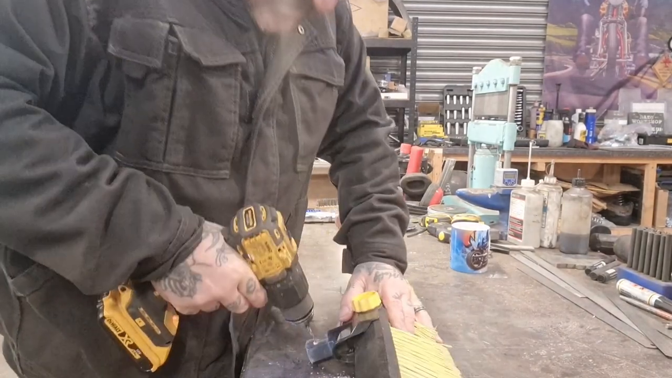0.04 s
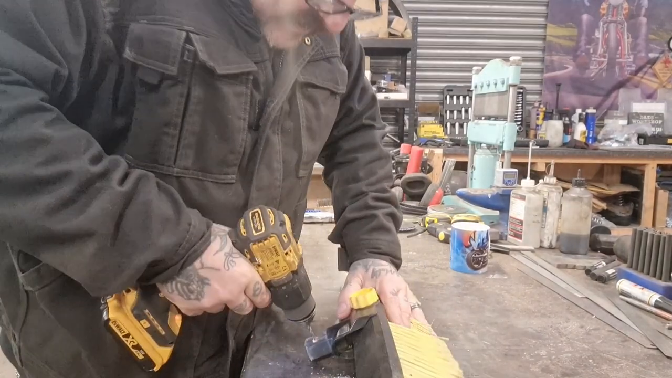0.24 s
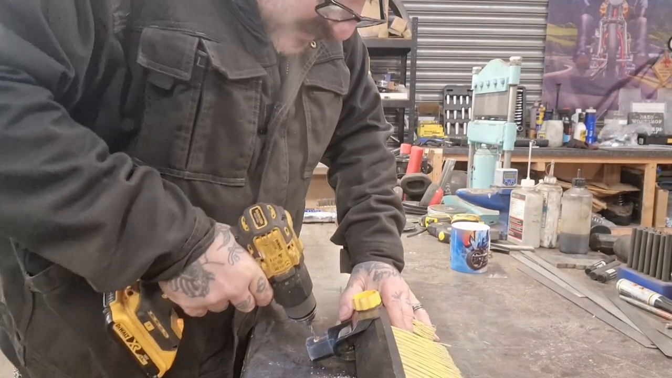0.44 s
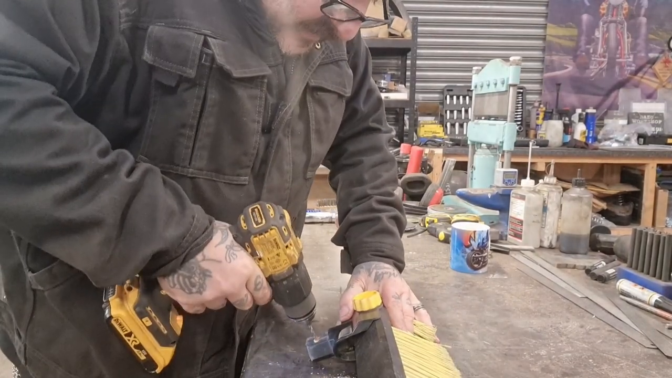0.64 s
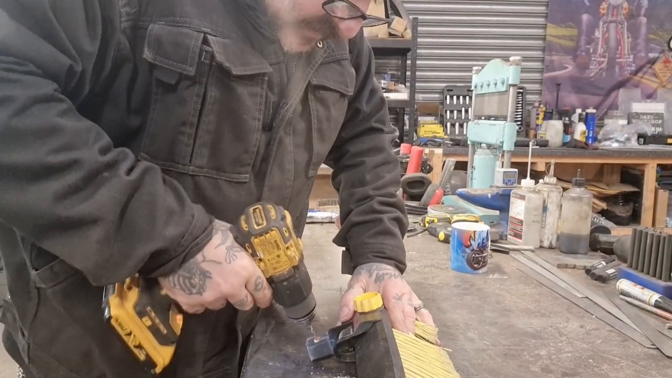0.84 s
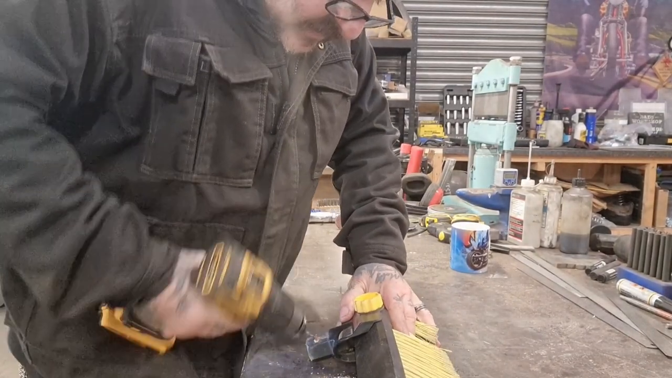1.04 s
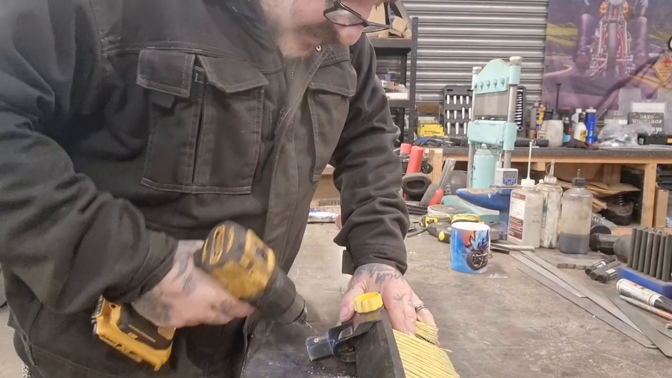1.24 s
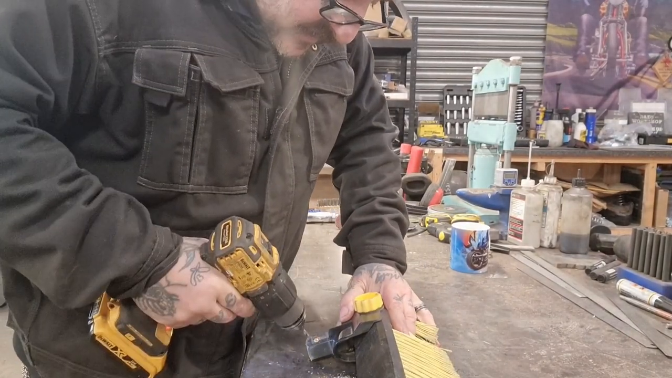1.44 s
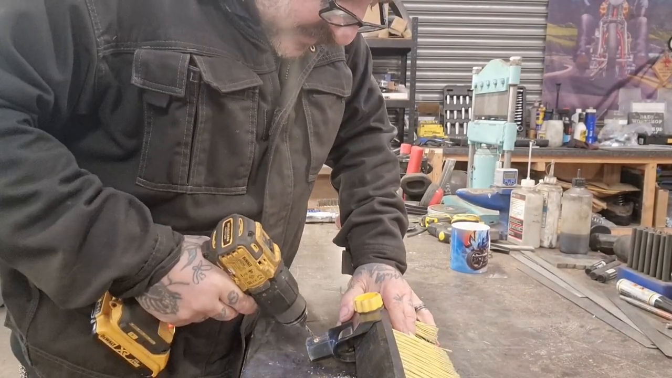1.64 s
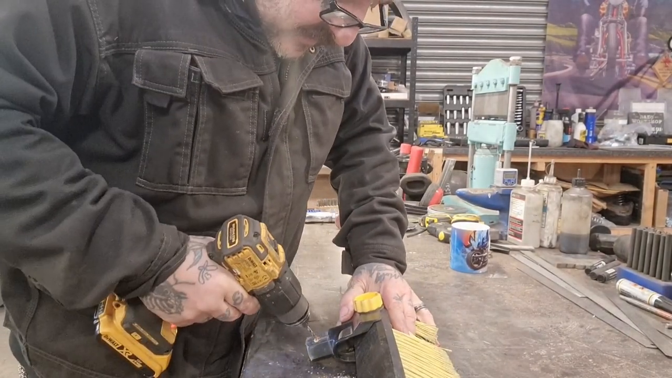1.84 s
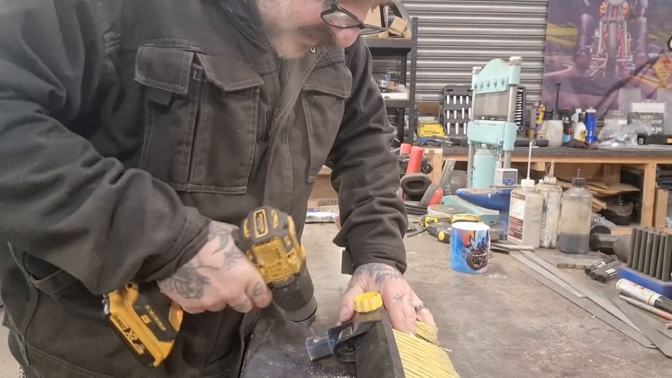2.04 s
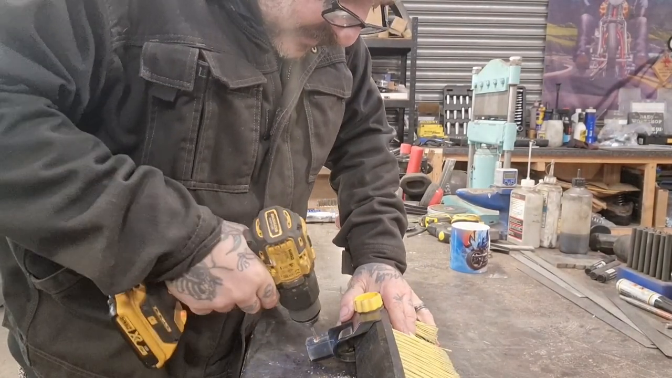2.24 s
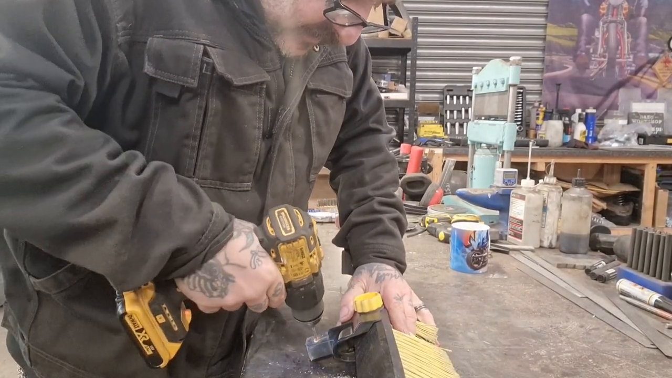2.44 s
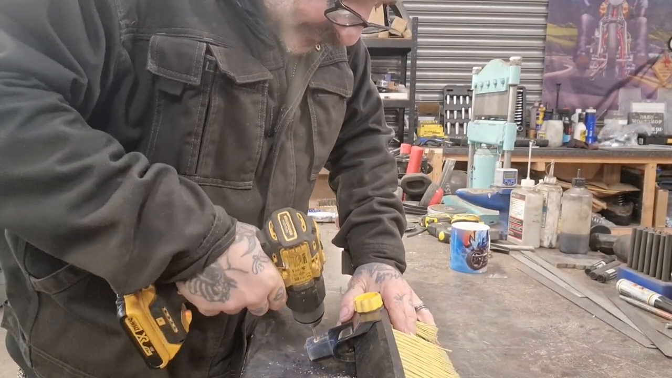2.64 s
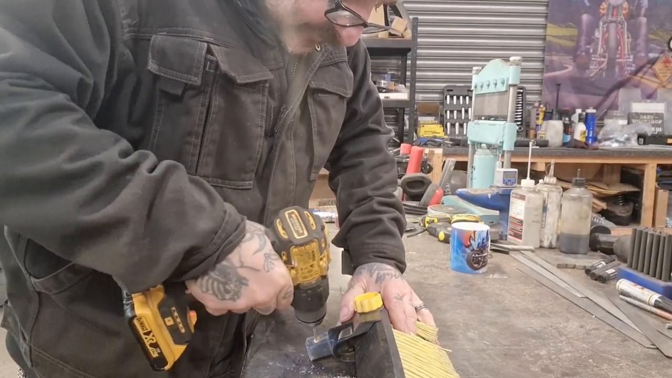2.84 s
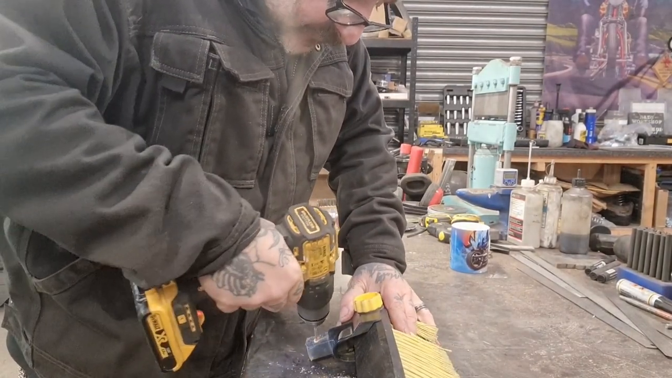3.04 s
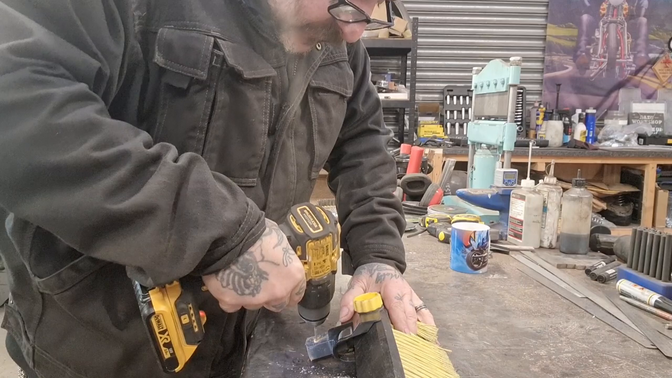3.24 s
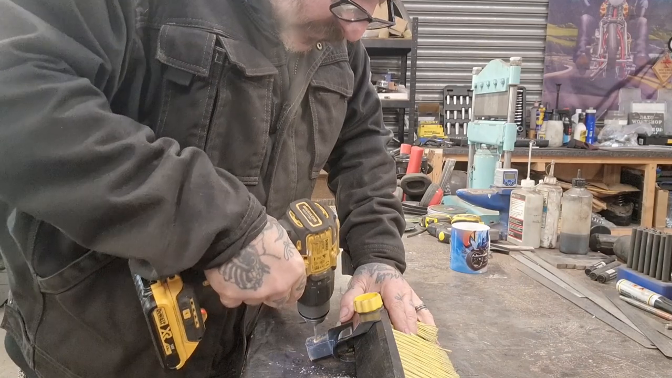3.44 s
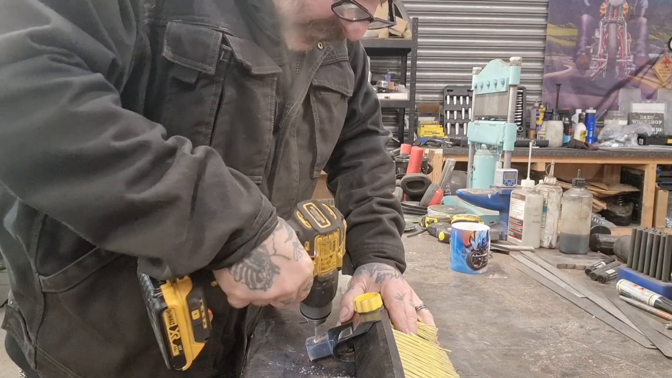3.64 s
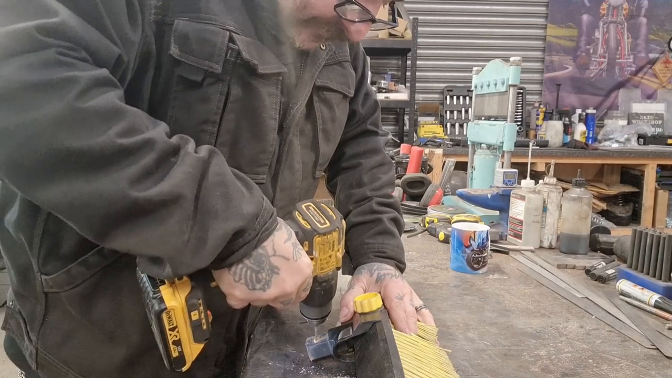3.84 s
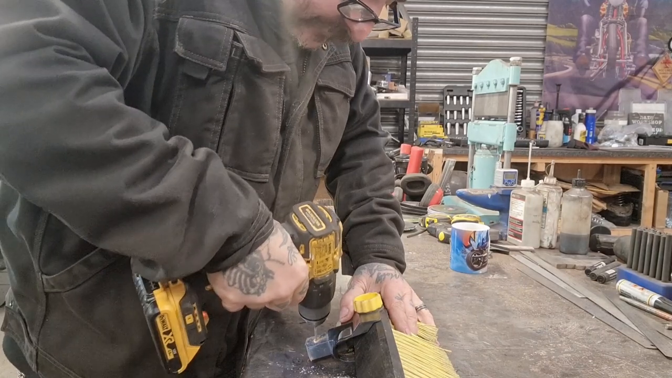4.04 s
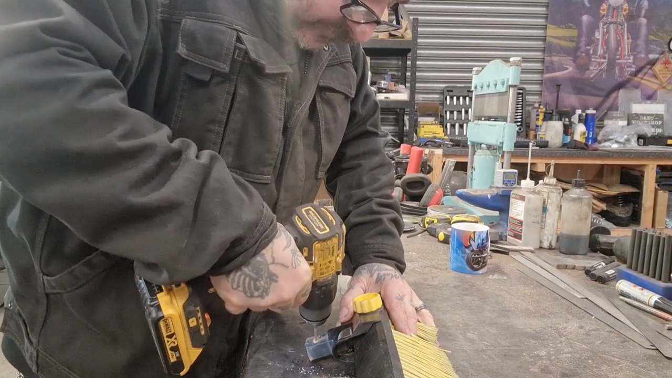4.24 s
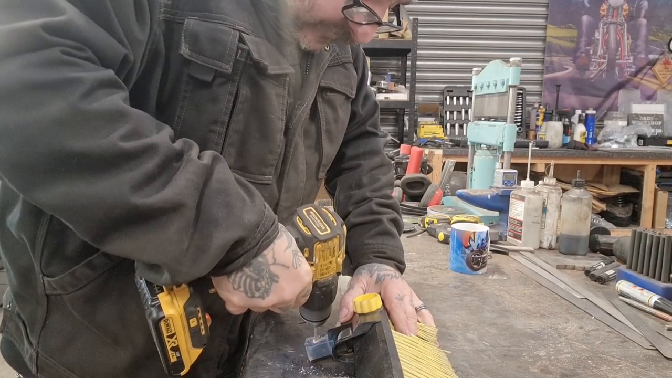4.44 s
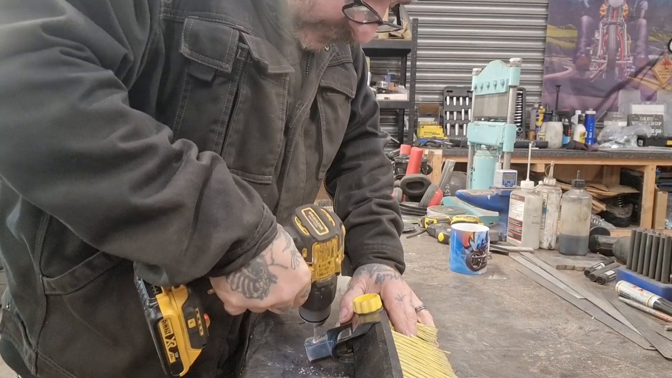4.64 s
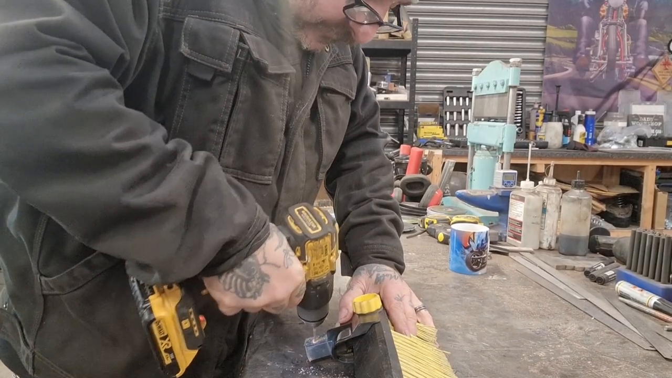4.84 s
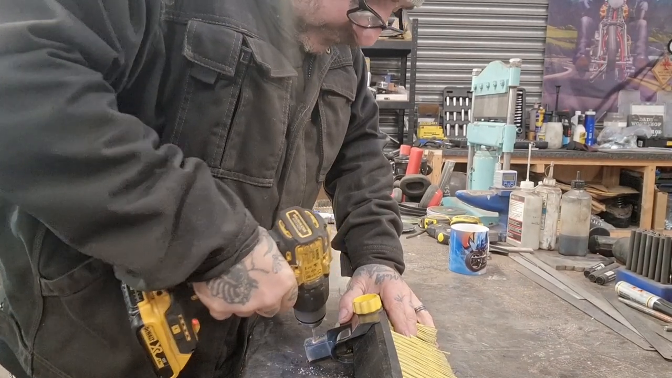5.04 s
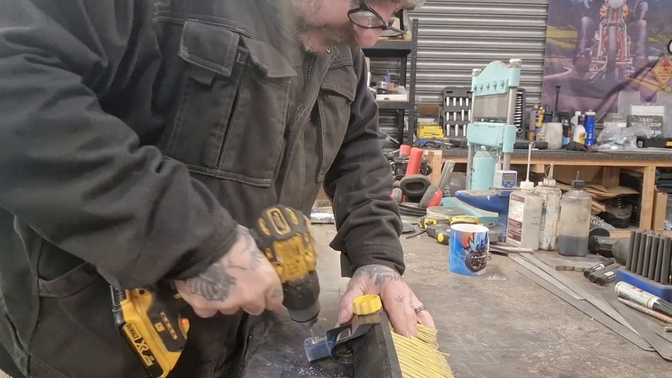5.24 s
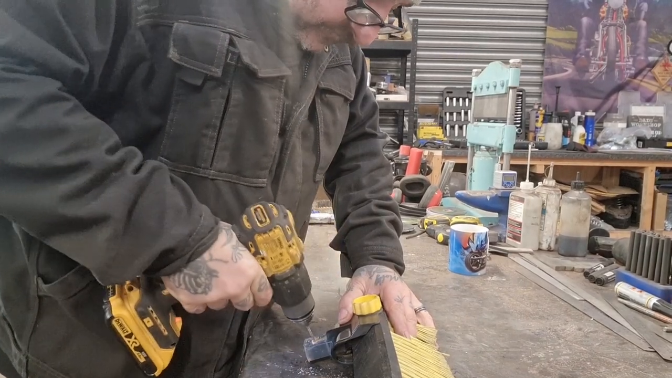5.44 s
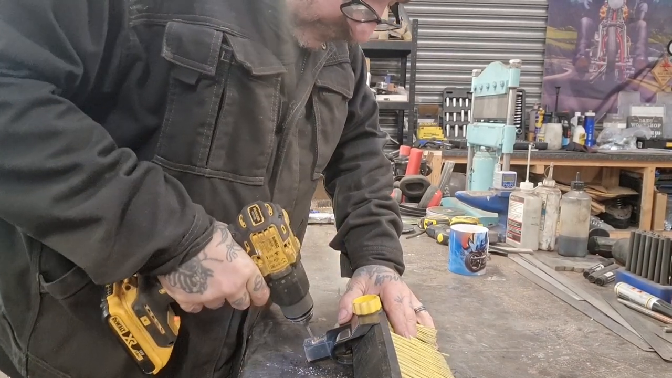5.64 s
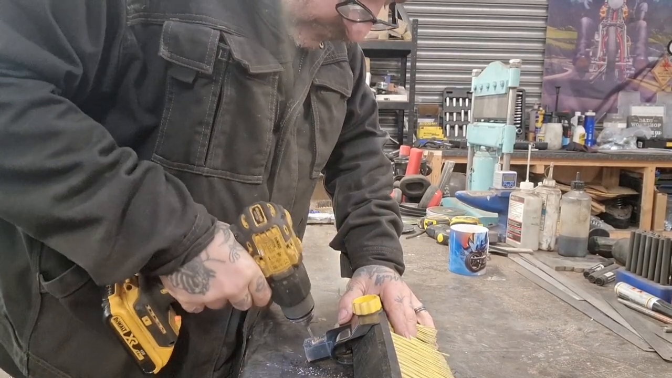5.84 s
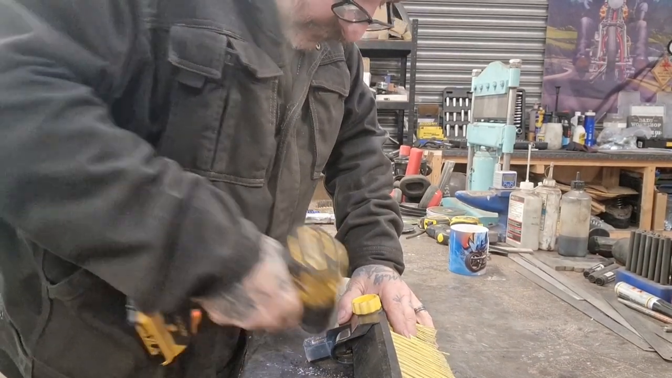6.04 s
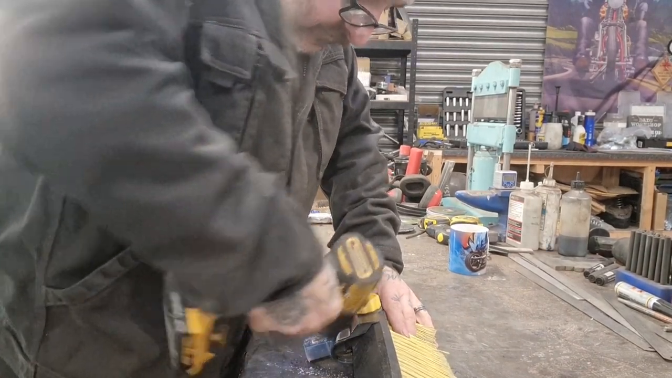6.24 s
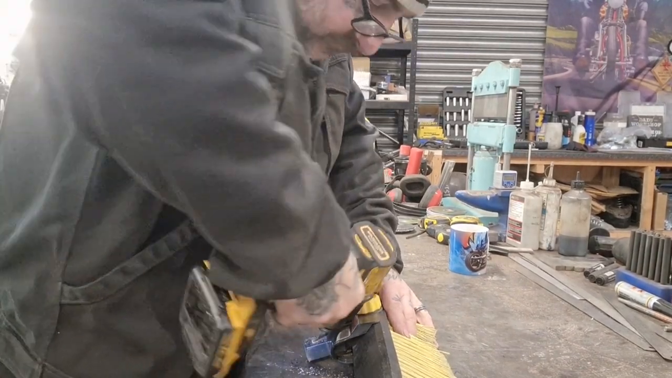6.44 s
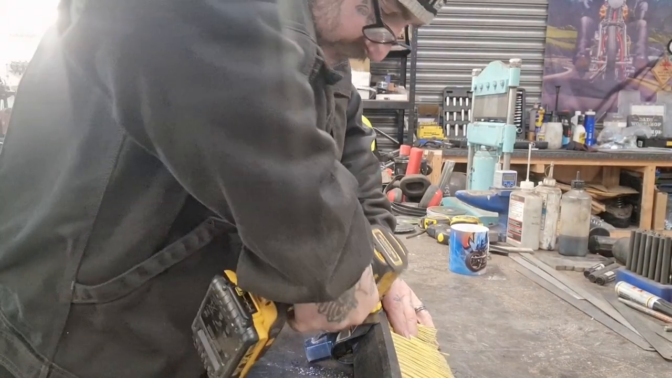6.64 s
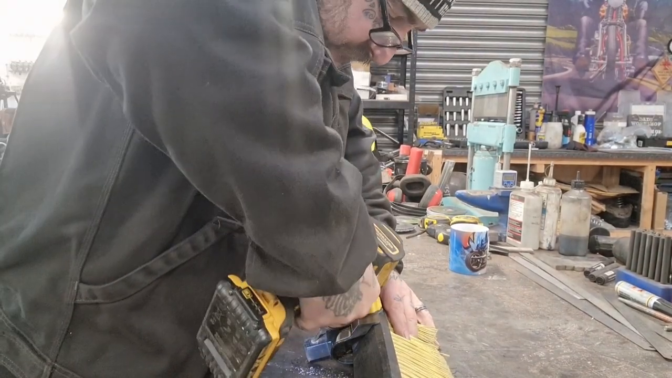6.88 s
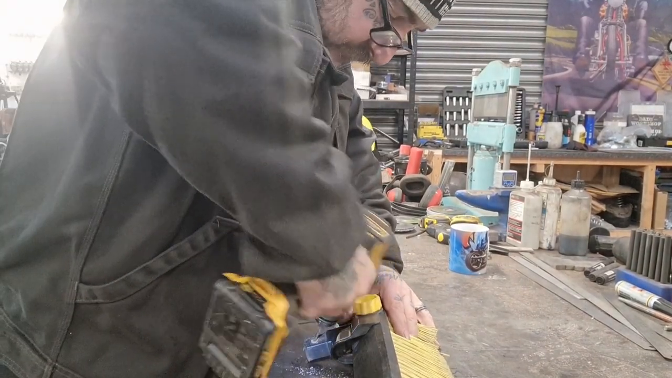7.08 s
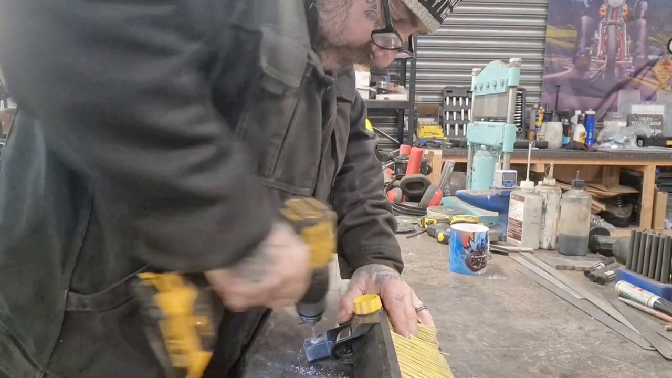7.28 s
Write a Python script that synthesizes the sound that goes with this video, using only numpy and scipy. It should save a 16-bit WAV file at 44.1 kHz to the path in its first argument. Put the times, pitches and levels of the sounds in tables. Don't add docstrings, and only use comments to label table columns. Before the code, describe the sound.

Handheld power drill in three pulls, rattling gears and a high motor whine, with trigger clicks and bench shudder over a faint shop hum.

```python
import sys
import numpy as np
from scipy import signal
from scipy.fft import rfft, irfft, next_fast_len
from scipy.io import wavfile
from scipy.ndimage import uniform_filter1d, map_coordinates

SR = 44100
rng = np.random.default_rng(int(sys.argv[2]) if len(sys.argv) > 2 else 0)


def transcribe(signal):
    frames = np.atleast_2d(signal).T
    limited = np.clip(frames, -1, 1)
    pcm = np.round(limited * 32767).astype(np.int16)
    wavfile.write(sys.argv[1], SR, pcm)


def undo_db(level):
    steps = np.asarray(level, float) / 20
    return 10 ** steps


N = 322371

# hz, level_db per hz
SHOP_HUM = [(20, -46), (45, -8.5), (75, -11.5), (100, 3.5), (125, -4), (165, 4.5), (250, -11), (300, -4.5),
            (500, -12.5), (900, -17), (2500, -20.5), (5000, -31.5), (9500, -39), (16000, -81)]
# hz, likeness
SHOP_ALIKE = [(60, 0.96), (180, 0.95), (550, 0.35), (1650, -0.36), (4970, 0.27), (15000, -0.4)]
# hz, width_hz, level_db
FAR_FAN = [(705, 37, -61.5), (1520, 130, -58.5), (1950, 180, -59.5)]
SHOP_LEVEL_DB, ECHO_DB, ECHO_S = -45, 7.5, 0.021
# hz, t60_s
HALL = [(200, 0.47), (2000, 0.57), (10000, 0.017)]
LINGER_DB, LINGER_S = -14.5, 0.01

# hz, likeness
ALIKE = [(60, .99), (250, .95), (700, .88), (1500, .82), (3000, .82), (6000, .62), (9000, .55), (14000, .3)]
# hz, level_db
LEAN = [(60, 3.5), (150, 2), (380, 2.5), (950, 3.5), (2380, 7), (5980, 6.5), (15000, 10.5)]
# hz, phase_rad
LEAD = [(60, 0), (950, 0), (1400, 1.1), (2300, .5), (3000, 1.1), (5000, 1.3), (8300, 2.1), (10000, 3),
        (15000, 3.7)]
TOP_HZ = 15870

# start_s, end_s
RUNS = [
    (.33, 1.2),
    (1.96, 6.3),
    (6.4, 7.31),
]
# squeeze_s, release_s, free_speed_hz, spin_up_s (time constant)
PULLS = [
    (.346, .872, 353, .042),
    (1.988, 5.986, 369.5, .042),
    (6.414, 7.145, 368.5, .046),
]
BRAKE_HZ, BRAKE_S, BRAKE_BEND = 114, .113, 1.33
LOCK_S, LOCK_FADE_S = .235, .035
# time_s, sag_hz
LOAD = [(.3, 4), (1.5, 4), (2.25, 3), (2.42, 5.5), (2.8, 1), (3.25, 0), (3.4, 1.3), (4.72, 2), (4.86, 1.5),
        (5.02, 4.2), (5.55, 5.2), (5.65, 3.5), (5.87, 3), (5.97, .5), (6.4, 4), (7.31, 4)]

# rattle_db, whirr_db, upper_db, air_db, grind_db
FACING = [
    (-30.5, -31.5, -31.5, -39.5, -42.5),
    (-30.5, -31.5, -31.5, -38.5, -44.5),
    (-34.5, -37, -36, -44.5, -48.5),
]
SPIN_UP_DB = (65, 34.4, 40, 35, 44.4)
RUN_DOWN_DB = (58, 41.7, 52, 42, 23.7)
COAST = (0.49, 0.72, 0.97)
LOAD_DB = 0.17
# time_s, change_db
LIFTS = [
    (.966, -6),
    (6.128, -3),
    (7.275, -1.5),
]
# middle_s, length_s, brighter_db
GLINTS = [(.7, 0.26, 3), (4.05, .1, 2), (4.26, 0.14, 4.5), (4.9, 0.265, 4)]

# start_s, ring_db, ring_hz, t60_s, snap_db, snap_top_hz
TICKS = [(.289, -45, 3900, .03, -47, 6000), (1.375, -46, 2800, .03, -49, 9000),
         (1.8735, -40, 1930, 0.032, -39, 2550), (1.975, -44, 3900, .03, -41, 9000),
         (1.993, -38, 2800, 0.036, -39, 1500), (6.1705, -22.5, 4730, 0.023, -31, 9000),
         (6.187, -45, 4700, .02, -38, 12000), (6.417, -39, 4700, 0.018, -28, 14000),
         (6.429, -24.5, 500, 0.027, -42, 14000)]
# start_s, length_s, pitch_hz, level_db
CHOP = [(0.313, 0.062, 2370, -50.5), (0.36, .02, 3900, -39), (0.365, 0.04, 3800, -33),
        (0.406, 0.051, 7700, -26), (0.924, 0.034, 7700, -24), (0.931, 0.023, 3700, -33),
        (1.039, 0.041, 7700, -42), (1.977, 0.017, 3900, -57), (2.014, 0.052, 3900, -32.5),
        (6.43, .04, 3800, -42), (6.445, .04, 4000, -38), (7.071, 0.082, 1438, -38)]

CHUCK = .1323
# chuck_order, level_db
WOBBLE = [
    (1, -1.5),
    (2, -4),
    (4, -9.5),
    (6, -15),
]
# middle_s, length_s, level_db
SHAKES = [(1.04, .3, -44), (2.19, .3, -37), (2.47, 0.23, -42), (3.91, .25, -57), (5.55, .5, -42),
          (5.9, .5, -44), (6.7, 0.68, -38.5), (7.08, 0.56, -36.5)]
# middle_s, length_s, level_db
THUMPS = [
    (.98, 0.15, -44),
    (2.07, 0.082, -39.5),
    (6.54, 0.21, -35),
    (7.12, 0.26, -50),
]
SHAKE_DB, DRONE_DB = -75, -42.5
# hz, level_db per hz
DRONE = [(35, -46), (60, -2), (70, -14), (89, -7.5), (183, 6), (203, 2), (232, -7), (270, -10.5),
         (350, -49), (590, -120)]
# hz, level_db per hz
GRIND = [(150, -44), (260, -42), (292, 6.5), (327, -3.5), (428, -6), (710, 2.5), (877, 1.5), (941, 4.5),
         (1100, -9), (1200, 2.5), (1560, -11), (2640, -120)]

# hz, width_hz, level_db
VENT = [
    (7600, 290, -33.5),
    (8370, 710, -39.5),
]
LEAN_SAG_HZ = (1.8, 3.2)

# hz, level_db per hz
RATTLE = [(680, -31), (1150, -24.5), (1430, -4), (1670, -8), (1880, -1.5), (2120, 1.5), (2750, -7),
          (2850, -13.5), (3020, -9.5), (3090, -24), (3300, -14.5), (4290, -19), (7260, -120)]
# hz, level_db per hz
TILTED = [(800, -14.5), (1150, -10.5), (1450, -3), (1700, -9.5), (2100, 1), (2500, -2), (3200, -10.5),
          (4300, -32), (7000, -120)]
# hz, level_db per hz
WHIRR = [(1880, -35), (3200, -7.5), (3760, -2), (4440, -6.5), (4810, -3), (5160, -12), (5300, -4.5),
         (6890, -42), (11700, -120)]
# hz, level_db per hz
FIRST_WHIRR = [(1880, -30), (3200, -10.5), (3540, -3), (4130, -6), (4450, -3), (5300, -8), (6890, -41),
               (11700, -120)]
# hz, level_db per hz
UPPER = [(3060, -40), (5200, -15), (5670, -7.5), (6640, -6.5), (6760, -8), (8040, -5), (8530, -6),
         (9600, -13), (12500, -81), (21100, -120)]
# hz, level_db per hz
FIRST_UPPER = [(3350, -32), (5700, -10), (5830, 0), (6380, -0.5), (6920, -2), (8970, 2.5), (9600, -12),
               (12500, -40), (21100, -120)]
# hz, level_db per hz
AIR = [(5590, -34), (9500, -35), (9940, 0), (10900, 0), (12500, 1.5), (14400, 0), (15600, -2)]

# magnets_8_db, magnets_16_db, fan_blades_19_db
LINES_DB = [
    (-45, -48, -49),
    (-47, -52, -46),
    (-41, -66, -58),
]
LINES_LOAD_DB = (0, 2, 1)
LINES_SPEED_DB = (40, 200, 110)
# pitch_hz, width_hz, level_db of each pull
HORN = (3950, 320, [-28, -28, -27])
# middle_s, length_s, level_db
BITES = [(.74, .3, -44), (2.3, .2, -47), (2.78, .42, -38), (2.95, .75, -38), (4.15, .5, -41),
         (4.85, .2, -43), (5.42, .3, -34), (5.66, .3, -35), (5.88, .28, -33), (6.57, .26, -36),
         (6.82, .5, -36), (7.1, .3, -35)]
# middle_s, length_s, level_db
BLADES = [(.72, .3, -41), (2.75, .6, -40), (3.24, .16, -41), (3.9, .6, -44), (4.55, .6, -41),
          (5.3, .7, -41), (5.96, .14, -37), (6.54, .1, -38), (6.68, .16, -47), (7.19, .1, -48),
          (.92, .07, -38)]
# rotor_order, pull_1_db, pull_2_db, pull_3_db
MESH = [(2.65, -45, -52, -56), (4, -60, -51, -55), (10.31, -54, -56, -47), (12.7, -51, -53, -54),
        (12.97, -44, -58, -59), (13.24, -54, -56, -58), (17.97, -46, -62, -60), (25.4, -48, -62, -62),
        (38, -59, -62, -65)]
# pitch_hz, width_hz, lift_db
SHELL = (7800, 400, 10)
BUMP = 1.2


def unit(x):
    return x / np.sqrt(np.mean(x ** 2) + 1e-20)


def along(points, hz):
    f, v = np.transpose(points)
    return np.interp(np.log(hz + 1), np.log(f + 1), v)


def wobble(rate):
    knots = rng.standard_normal(int(N * rate / SR) + 4)
    return map_coordinates(knots, [np.arange(N) * rate / SR])


def filtered(x, response):
    m = next_fast_len(N + SR // 2)
    return irfft(rfft(x, m) * response(np.fft.rfftfreq(m, 1 / SR)), m)[..., :N]


def swells(rows):
    t = np.arange(N) / SR
    total = np.zeros(N)
    for middle, length, height in rows:
        total += height * np.cos(np.pi * np.clip((t - middle) / length, -.5, .5)) ** BUMP
    return total


def gains(rows):
    return swells([(s, length, undo_db(db)) for s, length, db in rows])


def rush(spectrum, alike, beat=1, patchy_db=1, comb_db=0):
    z = signal.stft(rng.standard_normal((2, N)), nperseg=512)[2]
    patches = uniform_filter1d(rng.standard_normal(z.shape[1:]), size=5, axis=0)
    patches = uniform_filter1d(patches, size=12, axis=1)
    comb = uniform_filter1d(rng.standard_normal(z.shape[1:]), size=140, axis=1)
    z = z * undo_db(patchy_db * unit(patches) + comb_db * unit(comb))
    pair = beat * signal.istft(z, nperseg=512)[1][:, :N]

    def mid_side(hz):
        turn = np.arccos(np.clip(along(alike, hz), -1, 1)) / 2
        return undo_db(along(spectrum, hz)) * [np.cos(turn), np.sin(turn)]

    mid, side = filtered(pair, mid_side)
    return unit(np.array([mid + side, mid - side]))


def shop():
    hums = 0
    for hz, width, db in FAR_FAN:
        peak = [(hz - 3 * width, -40), (hz, 0), (hz + 3 * width, -40)]
        hums = hums + undo_db(db) * rush(peak, SHOP_ALIKE)
    hum_db = SHOP_LEVEL_DB + ECHO_DB * np.exp(-np.arange(N) / SR / ECHO_S)
    return undo_db(hum_db) * rush(SHOP_HUM, SHOP_ALIKE, patchy_db=-1.1) + hums


def hall(x):
    hz, t, z = signal.stft(rng.standard_normal((2, SR // 2)), SR, nperseg=256)
    tail = signal.istft(z * undo_db(-60 * t / along(HALL, hz)[:, None]), SR, nperseg=256)[1]
    late = np.pad(x, (400, 0))[None]
    return signal.fftconvolve(late, tail / np.linalg.norm(tail[0]), axes=1)[:, :N]


def placed(hz):
    half = undo_db(along(LEAN, hz) / 2) * np.exp(.5j * along(LEAD, hz))
    return np.array([half, 1 / half])


def pulled(ramp):
    t = np.arange(N) / SR
    return sum(np.clip(np.minimum(t - a, b + ramp - t) / ramp, 0, 1) for a, b in RUNS)


def rotor():
    t = np.arange(N) / SR
    pull = np.searchsorted([start for start, end in RUNS[1:]], t)
    squeeze, release, free_hz, rise = np.transpose(PULLS)[:, pull]
    sag_hz = np.interp(t, *np.transpose(LOAD))
    lost_hz = BRAKE_HZ * (np.maximum(t - release, 0) / BRAKE_S) ** BRAKE_BEND
    share = 1 - np.exp(-np.maximum(t - squeeze, 0) / rise) - lost_hz / free_hz
    locking = np.clip((release + LOCK_S - t) / LOCK_FADE_S, 0, 1)
    share = np.maximum(share * locking, .02)
    return pull, sag_hz, share * (free_hz - sag_hz), np.log10(share), t > release


def layers(motor):
    pull, sag_hz, rotor_hz, slow, released = motor
    steep_db = np.array([SPIN_UP_DB, RUN_DOWN_DB]).T[:, released * 1]
    steep_db = steep_db * np.where(released, np.take(COAST, pull), 1)
    lift_s, lift_db = np.transpose(LIFTS)[:, pull]
    lifted_db = lift_db * np.clip((np.arange(N) / SR - lift_s) / 0.0073, 0, 1)
    facing_db = np.transpose(FACING)[:, pull]
    direct = undo_db(facing_db + lifted_db + LOAD_DB * sag_hz + steep_db * slow)
    keep = np.exp(-1 / (LINGER_S * SR))
    return direct + undo_db(LINGER_DB) * signal.lfilter([1 - keep], [1, -keep], direct)


def contacts():
    out, t = np.zeros(N + SR), np.arange(SR // 8) / SR
    for s, ring_db, hz, t60, snap_db, top_hz in TICKS:
        ring = undo_db(ring_db - 60 * t / t60) * np.sin(2 * np.pi * hz * t)
        band = signal.butter(2, [400, top_hz], "band", fs=SR, output="sos")
        snap = unit(signal.sosfilt(band, rng.standard_normal(len(t))))
        snap = undo_db(snap_db - 60 * t / .025) * snap
        out[round(s * SR):][:len(t)] += (ring + snap) * (1 - np.exp(-t / .001))
    for s, length, hz, db in CHOP:
        flutter = uniform_filter1d(rng.standard_normal((2, len(t))), size=75)
        angle = 2 * np.pi * hz * t
        ring = unit(flutter[0] * np.sin(angle) + flutter[1] * np.cos(angle))
        swell = np.abs(np.sin(np.pi * np.clip(t / length, 0, 1))) ** 0.8
        out[round(s * SR):][:len(t)] += undo_db(db) * ring * swell
    return out[:N]


def bench(turns, motor):
    pull, sag_hz, rotor_hz, slow, released = motor
    shake = 0
    for order, db in WOBBLE:
        uneven = undo_db(db + 0.84 * wobble(4.9))
        shake = shake + uneven * np.sin(2 * np.pi * order * CHUCK * turns)
    shake = (undo_db(SHAKE_DB) + gains(SHAKES)) * shake
    drone_gain = (undo_db(DRONE_DB + 17 * slow) + gains(THUMPS)) * undo_db(-1.0)
    drone = drone_gain * rush(DRONE, ALIKE, patchy_db=1.5)
    grind = layers(motor)[4] * rush(GRIND, ALIKE, patchy_db=1.4)
    return shake + drone + grind


def vent(motor):
    pull, sag_hz, rotor_hz, slow, released = motor
    leant = uniform_filter1d(np.interp(sag_hz, LEAN_SAG_HZ, (0, 1)), size=8000)
    hiss = 0
    for (hz, width, db), share in zip(VENT, (leant, 1 - leant)):
        peak = [(hz - 2 * width, -25), (hz, 0), (hz + 2 * width, -25)]
        hiss = hiss + share * undo_db(db) * rush(peak, ALIKE, patchy_db=2.5)
    pull_db = np.take((-3, 0, -8), pull)
    return hiss * undo_db(60 * slow + pull_db)


def gears(turns, motor):
    bright_db = np.outer([-0.55, 0.069, 0.64, 0.83], swells(GLINTS))
    rattle, whirr, upper, air = layers(motor)[:4] * undo_db(bright_db)
    chuck, t = 2 * np.pi * CHUCK * turns, np.arange(N) / SR
    first, last = t < RUNS[1][0], t >= RUNS[2][0]

    def beat(knock_db):
        planets = np.sin(4 * chuck) + np.sin(3 * chuck / 2)
        return (1 + .04 * planets) * undo_db(knock_db * wobble(500))

    def chatter(colour):
        return rush(colour, ALIKE, beat(knock_db=1.7), patchy_db=1.0, comb_db=1.9)

    body = rattle * np.where(last, chatter(TILTED), chatter(RATTLE))
    body += whirr * np.where(first, chatter(FIRST_WHIRR), chatter(WHIRR))
    body += upper * np.where(first, chatter(FIRST_UPPER), chatter(UPPER))
    return body + air * rush(AIR, ALIKE, beat(knock_db=-1.8), patchy_db=2.0, comb_db=1.1)


def whine(turns, motor):
    pull, sag_hz, rotor_hz, slow, released = motor

    def tone(order, slip):
        cycles = order * turns + slip * wobble(45) + rng.random()
        return np.sqrt(2) * np.sin(2 * np.pi * cycles)

    steady_db = np.transpose(LINES_DB)[:, pull]
    steady_db = steady_db + np.outer(LINES_LOAD_DB, sag_hz) + np.outer(LINES_SPEED_DB, slow)
    horn_hz, horn_width_hz, horn_db = HORN
    sung = released * undo_db(horn_db)[pull] / (1 + ((16 * rotor_hz - horn_hz) / horn_width_hz) ** 2)
    sizes = undo_db(steady_db) + [gains(BITES) * undo_db(80 * slow), sung, gains(BLADES)]
    lines = 0
    for order, size in zip((8, 16, 19), sizes):
        lines = lines + size * undo_db(np.sqrt(order / 4) * wobble(18)) * tone(order, .07)

    speed_db = 45 * np.log10(rotor_hz / 355)
    shell_hz, width_hz, shell_db = SHELL
    for order, *levels_db in MESH:
        lift_db = shell_db * np.exp(-((order * rotor_hz - shell_hz) / width_hz) ** 2)
        mesh_db = np.take(levels_db, pull) + 1.8 * (sag_hz - 3.5) + speed_db + lift_db
        lines = lines + undo_db(mesh_db + 2.5 * wobble(6)) * tone(order, .2)
    return lines * np.clip(rotor_hz / 60 - 2.1, 0, 1)


def scene():
    motor = rotor()
    turns = np.cumsum(motor[2]) / SR
    clear = pulled(0.027) * whine(turns, motor) + contacts()
    noisy = pulled(0.02) * (gears(turns, motor) + bench(turns, motor) + vent(motor))
    drill = noisy + clear + undo_db(-17) * hall(clear)
    return filtered(drill, placed) + shop()


def band_limit(x):
    return signal.sosfilt(signal.butter(12, 16470, fs=SR, output="sos"), x)


def record(dry):
    mix = filtered(dry, lambda hz: hz < TOP_HZ)
    return band_limit(mix)


dry = scene()
out = record(dry)
transcribe(out)
```